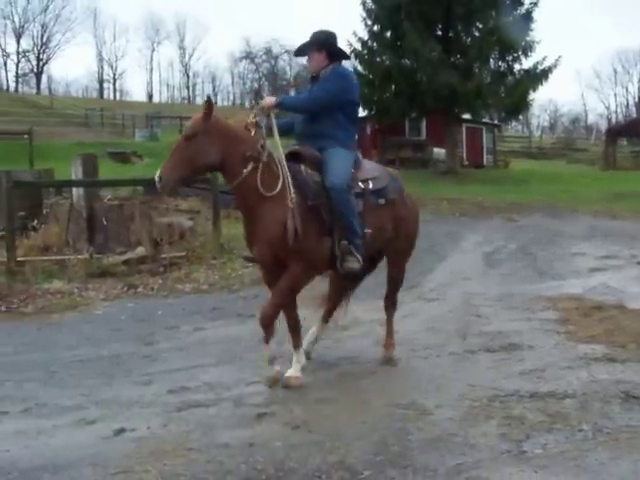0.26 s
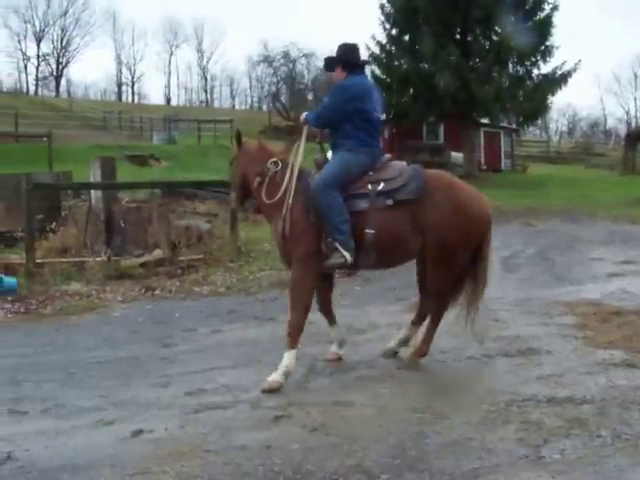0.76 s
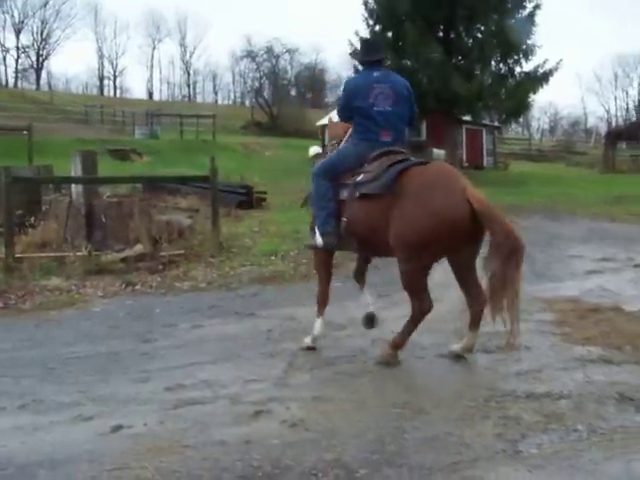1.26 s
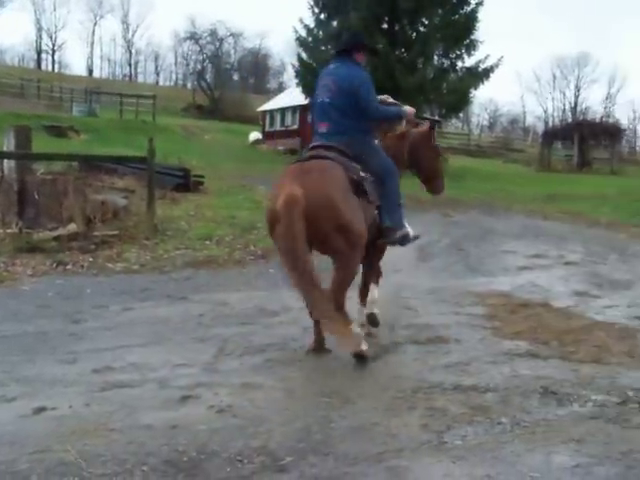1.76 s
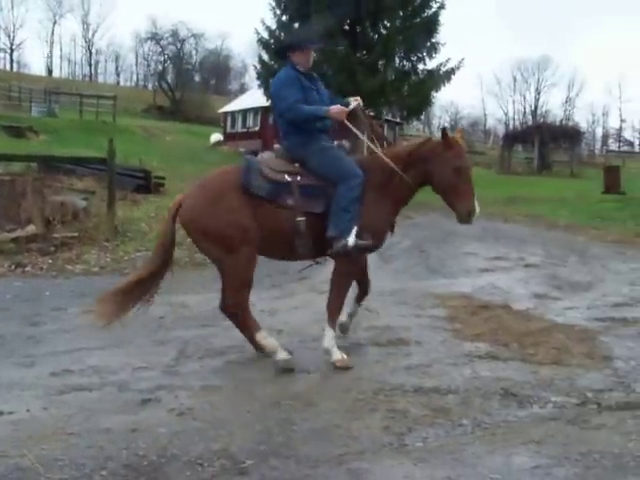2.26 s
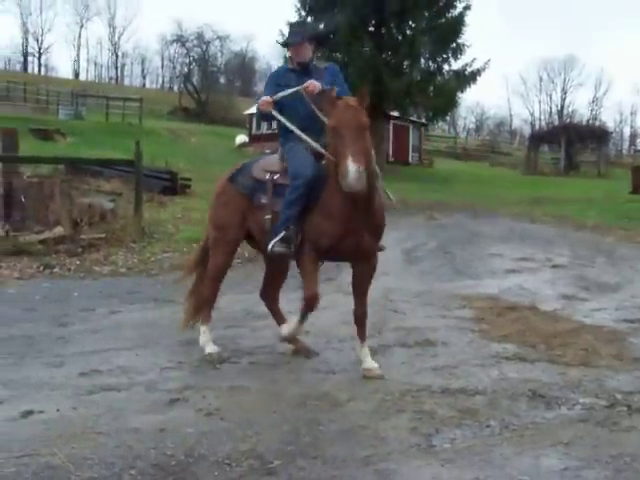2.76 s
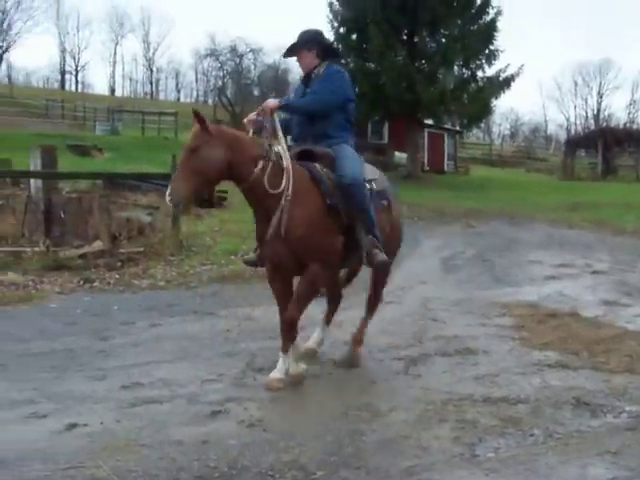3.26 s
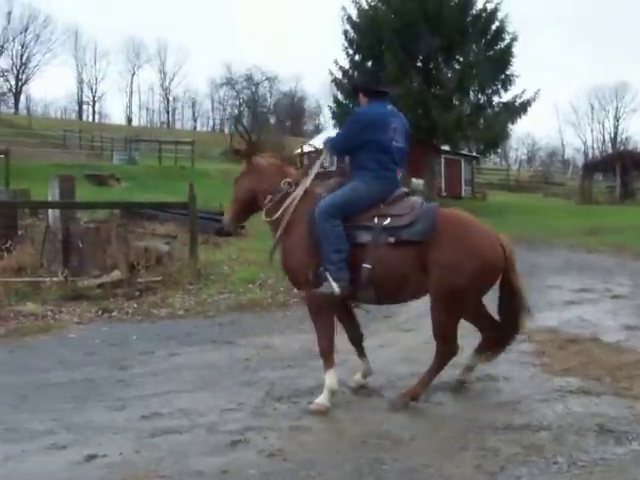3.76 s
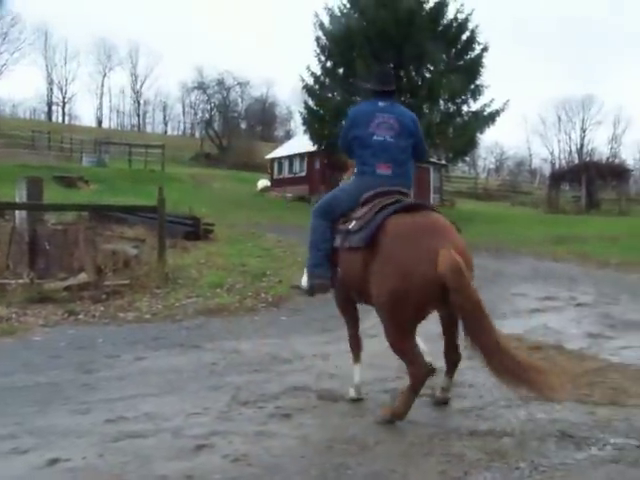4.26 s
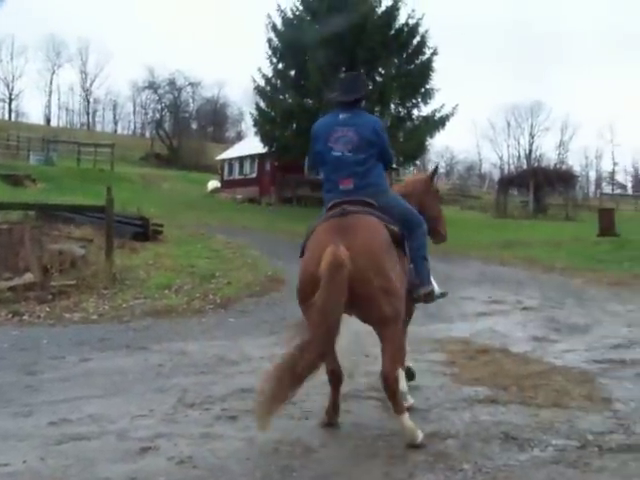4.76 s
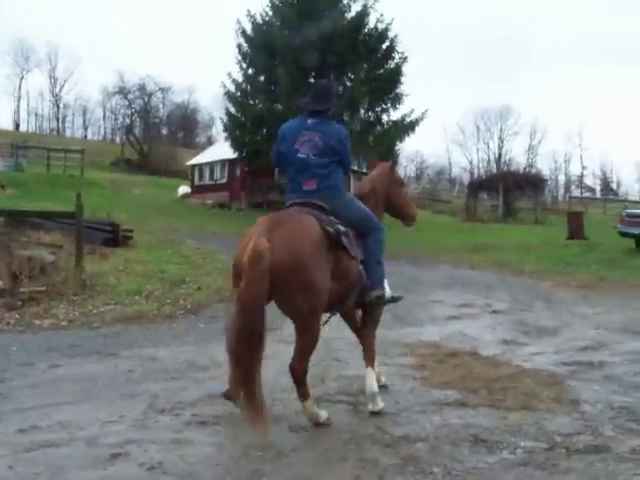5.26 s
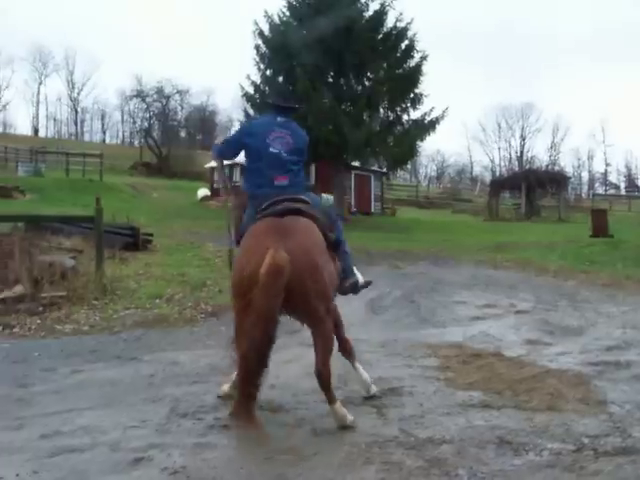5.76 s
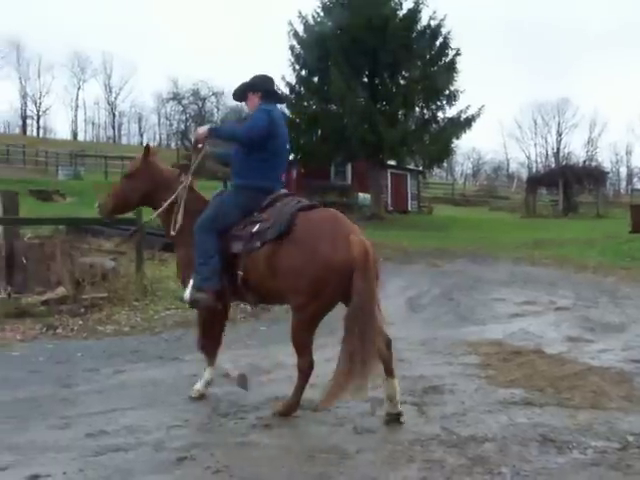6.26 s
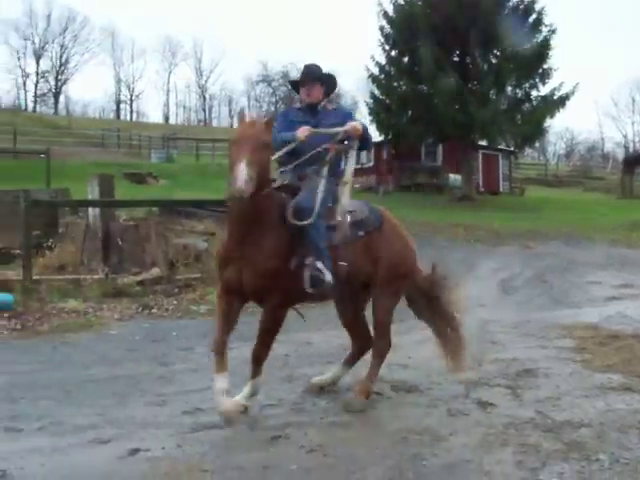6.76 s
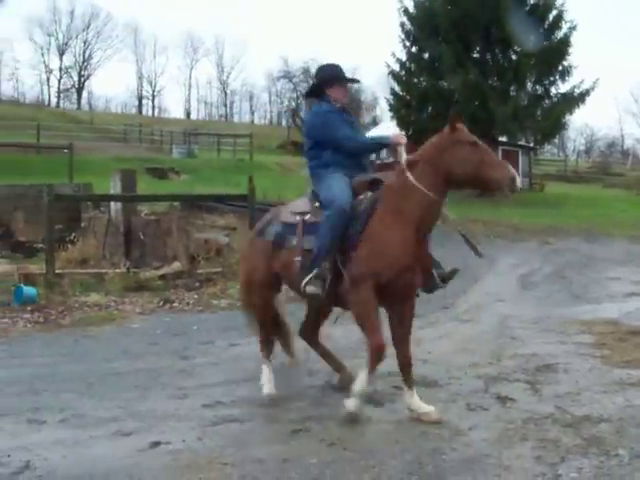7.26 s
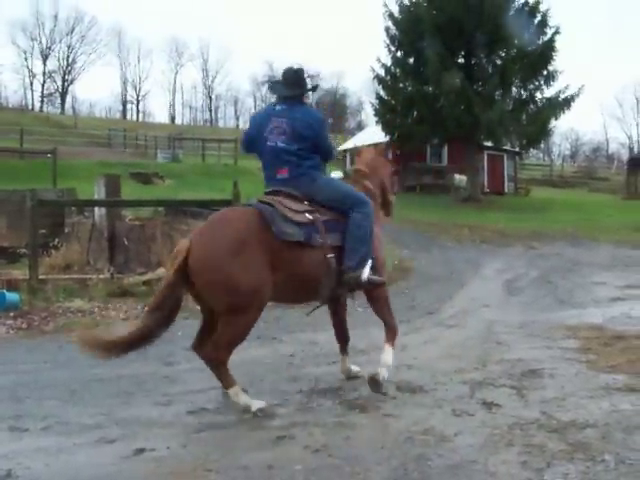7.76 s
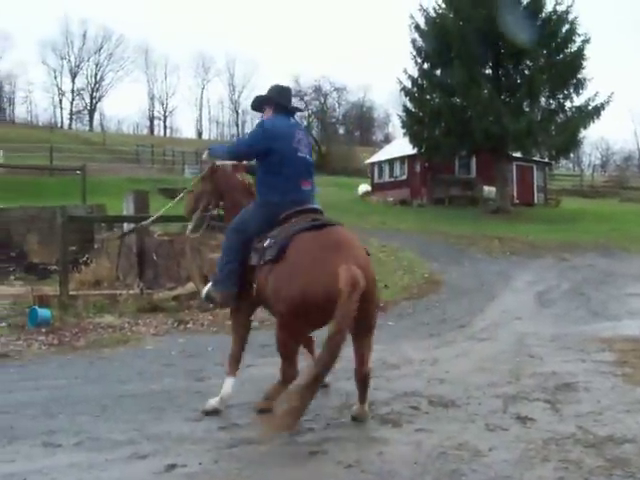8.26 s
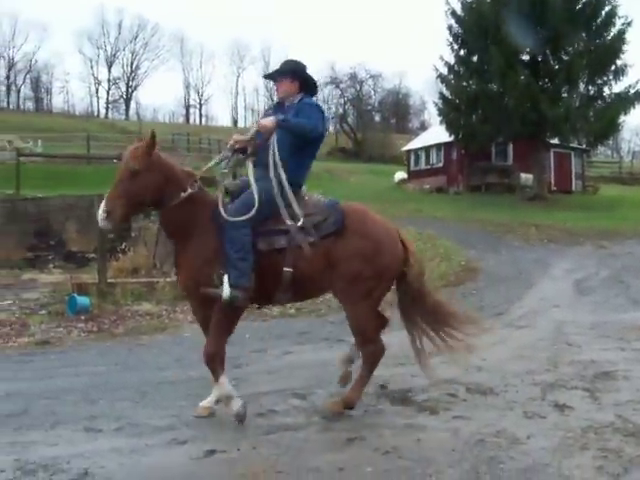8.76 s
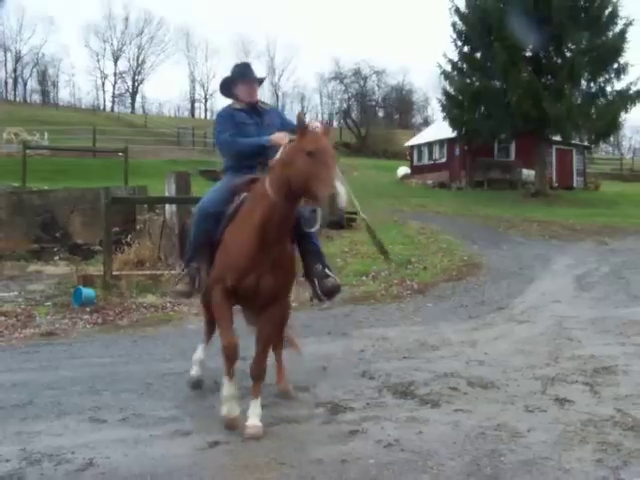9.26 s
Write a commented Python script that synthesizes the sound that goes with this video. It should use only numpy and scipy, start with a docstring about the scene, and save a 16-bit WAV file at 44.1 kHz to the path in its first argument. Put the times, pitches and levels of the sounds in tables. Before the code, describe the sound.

A horse turns on the spot on wet gravel, a few metres from a small stereo microphone in an open yard with barely any echo. Low gusty wind rumbles from the start; from about 0.3 s hooves scrape grit, crunch stones lightly and knock hollowly. Near 1.7 s stones squeak briefly, followed at 1.8 s by the sharpest, loudest crunch. Steps continue unevenly, with another snap at 2.4 s and grinding drags around 3 s. Dull thuds join some steps from 3.8 s, and a dense crunching cluster with strong clops comes at 4.4 s. Wind nearly drops away between 5.1 and 6.4 s, exposing cracks and scrapes. A thin stone squeak sounds at 6.45 s, then brisk grinding and crunches around 7 s. A short gust buffets near 8.6 s while sparser scrapes and hollow knocks go on to the end at 9.5 s.

```python
"""A ridden horse turns on the spot on wet gravel, a few metres from a small stereo camera, for 9.5 s.
It opens in wind, low noise driven by gusts at both microphone ports; from 0.3 s hooves knock (a hollow
resonance), crush stones (bursts of contacts) and grind the grit (dense clicks through resonances).
Stones squeal near 1.7 s; the crunches are strongest near 1.8 s and dense near 4.4 s; from 3.8 s damped thuds
join some footfalls. The breeze is weakest from 5.1 to 6.4 s, a stone squeals at 6.45 s, hooves go on to the end."""
import sys
import numpy as np
from scipy import signal
from scipy.fft import rfft, irfft
from scipy.io import wavfile
from scipy.ndimage import uniform_filter1d

SR = 44100
rng = np.random.default_rng(int(sys.argv[2]) if len(sys.argv) > 2 else 0)


def unload_audio(sound):
    """Save the sound as a 16-bit wav file, at the path given as the first command line argument."""
    columns = np.transpose(np.atleast_2d(sound))
    # keep every value between -1 and 1, then stretch to whole-number steps
    steps = np.round(np.clip(columns, -1, 1) * 32767)
    wavfile.write(sys.argv[1], SR, steps.astype(np.int16))


N = 419832
TIME = np.arange(N) / SR

# All source levels are before the mix, the ports and the camera response.
# stones crushed under a hoof: (t/s, length/s, level/dB, stone resonance f/Hz)
CRUSHED_STONES = [(0.326, 0.0015, -19.5, 2100), (0.512, 0.018, -25, 2700), (0.68, 0.0034, -18, 2300),
                  (0.702, 0.009, -18, 2240), (0.748, 0.004, -28, 3400), (1.049, 0.002, -21, 3040),
                  (1.177, 0.015, -22.5, 2230), (1.271, 0.002, -21, 3640), (1.456, 0.00097, -21, 2770),
                  (1.482, 0.0076, -19, 2160), (1.534, 0.011, -13.5, 3020), (1.77, 0.014, -15, 3300),
                  (1.8, 0.0016, -4.5, 3220), (1.811, 0.013, -8, 3300), (1.826, 0.014, -14, 3470),
                  (1.872, 0.0075, -20.5, 3500), (2.262, 0.015, -14.5, 3350), (2.351, 0.009, -18.5, 4550),
                  (2.384, 0.0013, -8, 3100), (2.407, 0.0073, -16.5, 4600), (2.67, 0.0049, -21, 3100),
                  (2.902, 0.0096, -18, 3130), (3.493, 0.0065, -19, 3420), (3.68, 0.027, -18, 3870),
                  (3.822, 0.0077, -21.5, 3240), (3.867, 0.0077, -16, 3230), (4.036, 0.0088, -19, 3500),
                  (4.096, 0.011, -16.5, 3440), (4.282, 0.019, -19, 4160), (4.315, 0.0061, -13, 4100),
                  (4.347, 0.0026, -17, 4470), (4.364, 0.012, -16.5, 3290), (4.383, 0.01, -9.5, 4770),
                  (4.399, 0.0065, -7, 4700), (4.413, 0.02, -9.5, 3660), (4.568, 0.0011, -19.5, 2940),
                  (4.995, 0.0031, -20.5, 4620), (5.124, 0.015, -15.5, 3920), (5.23, 0.0056, -24, 4260),
                  (5.346, 0.0075, -18.5, 1450), (5.572, 0.0033, -22, 2230), (5.585, 0.0096, -9.5, 3200),
                  (5.615, 0.01, -16, 3330), (5.695, 0.0042, -12.5, 3530), (5.75, 0.0041, -13.5, 3400),
                  (6.187, 0.003, -9, 1730), (6.21, 0.0023, -12, 3870), (6.286, 0.0032, -17.5, 3680),
                  (6.469, 0.0016, -18, 4320), (6.546, 0.0035, -19, 4300), (6.622, 0.022, -17, 2020),
                  (6.706, 0.017, -20, 4900), (6.811, 0.0068, -22.5, 3800), (6.851, 0.0094, -17, 4800),
                  (6.899, 0.0062, -8.5, 4830), (7.024, 0.013, -19.5, 3780), (7.226, 0.0053, -18, 4100),
                  (7.241, 0.002, -9, 4140), (7.272, 0.0069, -18.5, 3300), (7.287, 0.029, -16.5, 4320),
                  (7.495, 0.003, -21, 3930), (7.695, 0.013, -22, 2800), (7.768, 0.03, -21, 3380),
                  (8.069, 0.0059, -15.5, 3720), (8.087, 0.0085, -12.5, 1980), (8.114, 0.0067, -21, 1620),
                  (8.248, 0.0022, -8.5, 3150), (8.269, 0.012, -21.5, 3940), (8.365, 0.007, -17, 3540),
                  (8.424, 0.014, -21.5, 4100), (8.447, 0.0031, -13, 4100), (8.692, 0.0087, -17.5, 3330),
                  (8.761, 0.024, -21, 4300), (9.182, 0.03, -19, 3900)]
# a hoof drags or pivots on the grit: (t/s, length/s, level/dB, swell over the length/dB)
HOOF_SCRAPES = [(0.264, 0.12, -32, 4), (0.438, 0.11, -28, -13), (0.682, 0.19, -27.5, 1.5),
                (0.95, 0.1, -25.5, -3.5), (1.096, 0.17, -29, -7), (1.397, 0.042, -18.5, 1.5),
                (1.55, 0.1, -31.5, -1), (1.674, 0.05, -24.5, -3), (1.841, 0.1, -24.5, -5),
                (2.114, 0.15, -25.5, -4), (2.298, 0.14, -25, 16.5), (2.582, 0.14, -29, -7),
                (2.856, 0.31, -30, -5), (3.046, 0.205, -27, 17.5), (3.304, 0.084, -31, -4),
                (3.592, 0.14, -23.5, 1), (3.753, 0.089, -18, -9.5), (3.928, 0.12, -24, 1),
                (4.071, 0.096, -24.5, -8), (4.21, 0.22, -24, 12), (4.424, 0.085, -17, -8.5),
                (4.639, 0.048, -26.5, 3.5), (4.775, 0.037, -31, -5), (4.903, 0.097, -32.5, 10),
                (5.081, 0.094, -25, 9), (5.327, 0.093, -27, -3.5), (5.505, 0.028, -20, -3),
                (5.59, 0.042, -23, -3), (5.732, 0.13, -25, -0.5), (5.964, 0.16, -28, 3),
                (6.154, 0.18, -27, -2), (6.441, 0.069, -29.5, 11), (6.54, 0.1, -18.5, -7),
                (6.704, 0.069, -26.5, -14), (6.806, .14, -22, 0), (7.023, 0.068, -17.5, 2.5),
                (7.109, 0.2, -21.5, 8.5), (7.383, 0.041, -16, -2.5), (7.476, 0.04, -19.5, 1),
                (7.563, 0.11, -22.5, 2), (7.768, 0.16, -30.5, -18), (7.943, 0.038, -22, 0.5),
                (8.069, 0.047, -28.5, -5), (8.187, 0.15, -24, 2), (8.352, 0.097, -18, -6),
                (8.478, 0.15, -28.5, -8), (8.663, 0.15, -27.5, -6), (8.875, 0.2, -27, 9),
                (9.334, 0.2, -28.5, -11)]
# grit that keeps shifting under the standing legs: (t/s, level/dB)
GRIT_SHUFFLE = [(0, -35), (1.35, -40.5), (1.9, -30), (2.7, -31.5), (4.3, -27.5), (5.3, -39.5), (6.4, -36.5),
                (7.2, -30.5), (8.4, -33.5), (9.25, -36)]
# how flat the sole lies on the grit: (t/s, level of the hollow resonance/dB)
SOLE_HOLLOW = [(0, -10), (2.3, -19), (2.7, -2.5), (3.2, -15), (4.4, -12.5), (4.8, -5.5), (5.5, -10),
               (6.05, -1.5), (6.4, -9.5), (7.2, -15.5), (7.6, -9), (8.4, -11), (9.5, -4.5)]
# spectral colour of gravel: (f/Hz, gain/dB)
GRAVEL_COLOUR = [(120, -7), (330, -12), (500, -6), (750, 1), (1100, -1.5), (1450, -3.5), (2200, 0),
                 (2550, -4), (3350, 0.5), (3900, 0.5), (4400, 0), (5600, -8.5), (6700, -4.5), (7500, -12),
                 (8500, -32.5)]
# hollow knocks of the cupped hoof: (t/s, resonance f/Hz, level/dB)
HOOF_KNOCKS = [(0.294, 1080, -30.5), (1.148, 1090, -29), (1.271, 897, -28), (1.413, 1070, -23),
               (1.832, 1060, -20), (1.908, 845, -22.5), (2.655, 835, -27), (3.498, 1040, -21.5),
               (3.717, 705, -26), (3.759, 643, -27.5), (3.927, 478, -27.5), (3.989, 750, -26.5),
               (4.101, 1110, -21), (4.384, 880, -18), (4.414, 1170, -15.5), (4.807, 760, -30),
               (4.995, 745, -30.5), (5.063, 727, -30.5), (5.088, 755, -24.5), (5.127, 910, -22.5),
               (5.233, 560, -37.5), (5.262, 567, -37), (5.35, 1090, -26), (5.619, 926, -20),
               (5.695, 730, -21.5), (6.091, 810, -23), (6.175, 666, -28), (6.207, 920, -25),
               (6.483, 1100, -28.5), (6.58, 900, -20.5), (6.629, 770, -26), (6.715, 1015, -21),
               (6.853, 712, -22), (6.945, 642, -29), (7.495, 650, -24), (7.582, 1024, -22),
               (8.09, 1020, -21.5), (8.118, 990, -23), (8.964, 860, -27.5), (9.111, 687, -26.5),
               (9.189, 540, -22), (9.387, 760, -24)]
# a stone skids under the hoof: (centre t/s, half length to 1/e/s, mean f/Hz, pole bandwidth/Hz, level/dB)
STONE_SKIDS = [(1.697, .017, 3430, 800, -23.5), (1.729, 0.011, 2850, 550, -24),
               (6.451, 0.0087, 2606, 170, -19.5)]
# weight coming down on the ground: (t/s, level/dB)
GROUND_THUMPS = [(3.762, -20.5), (3.926, -20.5), (4.408, -24), (5.584, -33), (6.81, -27.5), (8.088, -26.5),
                 (9.185, -33)]
# gusts that reach the microphone: (t/s, length/s, level/dB)
WIND_GUSTS = [(-.1, 1.11, -24.5), (1.134, 0.52, -26), (1.76, 0.71, -26), (2.843, 0.065, -35),
              (3.034, 0.35, -28.5), (3.593, 0.23, -24.5), (4.097, 0.081, -29), (4.306, 0.3, -30),
              (4.76, 0.057, -35.5), (5.523, 0.29, -40), (6.155, 0.12, -42.5), (7.254, 0.13, -38),
              (8.033, 0.19, -30), (8.572, 0.066, -22.5), (8.713, 0.79, -35)]
# the light breeze between the gusts: (t/s, level/dB)
LIGHT_BREEZE = [(0, -31), (2.8, -40), (4.3, -42), (5.1, -51.5), (6.4, -51.5), (7.6, -46), (9.5, -42)]
# spectral colour of the wind rumble: (f/Hz, gain/dB)
WIND_COLOUR = [(20, -4), (60, 2), (130, 0), (220, -4), (330, -12.5), (1100, -55.5)]
# how the two ports differ: (f/Hz, left minus right/dB, side filter gain before a common offset/dB)
PORT_DIFFERENCES = [(298, 0, -21), (795, -0.5, -38.5), (1780, -5.5, -11), (2420, 2.5, -6), (2650, 8.5, -9),
                    (4300, -2, -11), (7950, 2, -3.5)]

SCRAPE_RISE_S, SCRAPE_FALL_S = 0.015, 0.02
GUST_RISE_S, GUST_FALL_S = 0.06, 0.066
TOP_HZ = 8700  # edge of the camera's lowpass


def undb(db):
    """Logarithmic level: decibels to amplitude gain."""
    return 10 ** (np.asarray(db) / 20)


def unit(x):
    """Normalisation: scale to rms 1."""
    return x / np.sqrt(np.mean(x ** 2) + 1e-18)


def curve(rows):
    """Linear interpolation: join (t/s, value) rows by straight lines."""
    return np.interp(TIME, *np.transpose(rows))


def colour(x, hz, db):
    """Minimum-phase filtering: a causal response through (f/Hz, gain/dB) points, by way of the cepstrum."""
    size = 4096
    bins = np.maximum(np.fft.rfftfreq(size, 1 / SR), 1)
    log_gain = np.log(undb(np.interp(np.log(bins), np.log(hz), db)))
    cepstrum = irfft(log_gain)
    # fold the negative times onto the positive ones
    cepstrum[1:size // 2] *= 2
    cepstrum[size // 2 + 1:] = 0
    response = irfft(np.exp(rfft(cepstrum)))
    return signal.fftconvolve(x, response)[:len(x)]


def ring(x, hz, q):
    """Resonance: one damped mode with gain 1 at its centre."""
    return signal.lfilter(*signal.iirpeak(min(hz, SR / 3), max(q, 1), fs=SR), x)


def moving_ring(x, hz, width_hz):
    """Resonance of varying frequency: shift the pitch curve to zero, smooth with two poles, shift back."""
    turn = np.exp(2j * np.pi * np.cumsum(hz) / SR)
    pole = np.exp(-np.pi * width_hz / SR)
    baseband = signal.lfilter([1], np.poly([pole, pole]), x / turn)
    return unit((baseband * turn).real)


def add(track, s, sound):
    """Superposition: lay a sound into a track at time s."""
    start = max(int(s * SR), 0)
    track[start:start + len(sound)] += sound[:max(N - start, 0)]


def clicks(count, rate, spread_db):
    """Random impacts: stone contacts at random moments, many small and a few large."""
    size = undb(spread_db * np.minimum(rng.standard_exponential(count), 4))
    hit = rng.random(count) < rate / SR
    return unit(hit * size * rng.choice([-1, 1], count))


def walk(rate):
    """Random fluctuation: bounded levels held 1 / rate s, smoothed twice and scaled to rms 1."""
    hold = int(SR / rate)
    steps = np.repeat(rng.uniform(-1, 1, N // hold + 1), hold)[:N]
    return unit(uniform_filter1d(uniform_filter1d(steps, hold), hold))


def envelope(s, length, rise_s, fall_s, swell_db=0):
    """Attack and decay: a linear rise, a hold with a steady swell or fade, an exponential fall."""
    t = TIME - s
    rise = np.clip(t / rise_s, 0, 1)
    held = np.clip(t / length, 0, 1)
    fall = np.exp(-np.maximum(t - length, 0) / fall_s)
    return rise * undb(swell_db * (held - .5)) * fall


def crunches(rise_s=0.001, fall_s=0.0016, stone_db=4, settle_db=-21, settle_s=0.043, crack_db=-2, crack_s=0.00054):
    """Fracture and settling: a stone cracks, contacts burst under the hoof, and loose stones settle."""
    out, t = np.zeros(N), TIME[:SR // 8]
    for s, length, db, hz in CRUSHED_STONES:
        after = np.maximum(t - length, 0)
        dying = np.exp(-after / fall_s) + undb(settle_db) * np.exp(-after / settle_s)
        press = np.minimum(t / rise_s, 1) * dying
        contacts = press * clicks(len(t), rate=7000, spread_db=3.5)
        crack = undb(crack_db) * rng.standard_normal(len(t)) * np.exp(-t / crack_s)
        blow = contacts + crack
        ringing = blow + undb(stone_db) * ring(blow, hz, q=6.0)
        stones = colour(ringing, *np.transpose(GRAVEL_COLOUR))
        add(out, s, undb(db) * stones / np.std(stones[t < length + rise_s]))
    return out


def grinding(snap_db=-5, tick_db=-4.0, slip_db=3.0, shift_db=4.0, tilt_db=4.0, sole_width_hz=170, sole_bend=.11):
    """Stick-slip friction: grit catches under a turning hoof, single stones snap, and the sole rings hollow."""
    # fine wet sand hisses, and coarse chips tick through it
    sand = clicks(N, rate=5000, spread_db=0.5)
    grit = sand + undb(tick_db) * clicks(N, rate=150, spread_db=2.5)
    # the stones under the hoof change, and the colour of the scrape with them
    scrape = np.zeros(N)
    for k, hz in enumerate(np.geomspace(450, 8000, num=8)):
        band = ring(ring(grit, hz, q=1.55), hz, q=1.55)
        scrape += (-1) ** k * undb(shift_db * walk(rate=30)) * band
    stones = unit(colour(unit(scrape) + undb(snap_db) * snaps(), *np.transpose(GRAVEL_COLOUR)))
    # the sole's pitch slides as it tilts against the ground
    hollow = np.zeros(N)
    for hz in (740, 980):
        pitch = hz * np.exp(sole_bend * walk(rate=12))
        hollow += undb(tilt_db * walk(rate=14)) * moving_ring(grit, pitch, sole_width_hz)
    rubbing = stones + undb(curve(SOLE_HOLLOW)) * unit(hollow)
    return rubbing * drag() * undb(slip_db * walk(rate=130))


def snaps(rate=45, spread_db=3.0, decay_s=0.0011, q=7):
    """Sudden release: stones snap from under the hoof with decaying noise, each size at its own pitch."""
    out = np.zeros(N)
    for hz in np.geomspace(1900, 5200, num=8):
        releases = np.abs(clicks(N, rate, spread_db)) + 1e-18
        fading = signal.lfilter([1], [1, -np.exp(-1 / (decay_s * SR))], releases)
        out += unit(ring(fading * rng.standard_normal(N), hz, q))
    return unit(out)


def drag():
    """Power addition: the scrapes and a faint shuffle sum as independent grinding sources."""
    power = undb(curve(GRIT_SHUFFLE)) ** 2
    for s, length, db, swell_db in HOOF_SCRAPES:
        power += (undb(db) * envelope(s, length, SCRAPE_RISE_S, SCRAPE_FALL_S, swell_db)) ** 2
    return np.sqrt(power)


def knocks(rise_s=0.0035, q=9, body_db=-4.5, body_hz=790, firm_db=-22, body_growth=0.78):
    """Cavity resonance: a rough contact rings the cupped hoof; firmer steps give a broader, deader clop."""
    out, t = np.zeros(N), TIME[:SR // 8]
    for s, hz, db in HOOF_KNOCKS:
        contact = clicks(len(t), rate=3000, spread_db=5.5) * t * np.exp(-t / rise_s)
        cup = unit(ring(ring(contact, hz, q), hz, q=2.5))
        body = unit(ring(ring(contact, body_hz, q=1), body_hz, q=1))
        # the damped body gains weight with the level of the step
        clop = cup + undb(body_db + body_growth * (db - firm_db)) * body
        # the contact peaks rise_s after it begins
        add(out, s - rise_s, undb(db) * clop / np.std(clop[:SR // 60]))
    return out


def skids(waver=0.022, upper=1.34, upper_db=-13, rough_db=4.5):
    """Friction-driven modes: a skidding stone rings at a wavering pitch with a fainter upper mode, and catches."""
    out = np.zeros(N)
    for s, half, hz, width_hz, db in STONE_SKIDS:
        pitch = hz * (1 + waver * walk(rate=120))
        slip = rng.standard_normal(N)
        upper_mode = moving_ring(slip, upper * pitch, width_hz)
        squeal = moving_ring(slip, pitch, width_hz) + undb(upper_db) * upper_mode
        catching = undb(rough_db * walk(rate=450))
        squeal = squeal * catching * np.exp(-((TIME - s) / half) ** 2)
        out += undb(db) * squeal / np.std(squeal[np.abs(TIME - s) < half])
    return out


def thumps(hz=155, decay_s=0.015):
    """Damped impact response: packed ground answers the horse's weight with a dull thud."""
    out, t = np.zeros(N), TIME[:SR // 8]
    for s, db in GROUND_THUMPS:
        push = rng.standard_normal(len(t)) * np.exp(-t / decay_s)
        thud = ring(ring(push, hz, q=0.95), hz, q=0.95)
        add(out, s, undb(db) * thud / np.std(thud[:SR // 40]))
    return out


def ports(x, scatter_db=1):
    """Interference: short ground and camera-body reflections of wandering strength differ at the two ports."""
    hz, balance_db, side_db = np.transpose(PORT_DIFFERENCES)
    lags = rng.integers(4, 90, size=6)  # in samples
    scattered = sum(walk(rate=6) * np.pad(x, (lag, 0))[:N] for lag in lags) / np.sqrt(len(lags))
    side = colour(scattered, hz, side_db + scatter_db)
    left = colour(x + side, hz, balance_db / 2)
    right = colour(x - side, hz, -balance_db / 2)
    return np.array([left, right])


def yard(x, t60=1.0, wet_db=-25):
    """Diffuse reverberation: a thin noise tail from fences and the woodpile, cut off after 0.5 s."""
    t = TIME[:SR // 2]
    tails = rng.standard_normal((2, len(t))) * np.exp(-np.log(1000) * t / t60)
    wet = [signal.fftconvolve(x, tail / np.linalg.norm(tail))[:N] for tail in tails]
    return undb(wet_db) * np.array(wet)


def wind(buffet_db=1.6, flutter_db=3.0, left_db=2.83, right_db=-1.5, rip_db=-11, rip_hz=430, rip_q=1.02,
         strong_db=-25, rip_growth=.4):
    """Turbulence: separate eddies at each port under common gusts; strong gusts rip more at higher pitch."""
    gust = airflow() * undb(buffet_db * walk(rate=20))
    force = (gust / undb(strong_db)) ** rip_growth
    out = []
    for port_db in (left_db, right_db):
        eddy = undb(flutter_db * walk(rate=50))
        rumble = unit(eddy * colour(rng.standard_normal(N), *np.transpose(WIND_COLOUR)))
        fast_eddies = eddy ** 2 * rng.standard_normal(N)
        rip = unit(ring(ring(fast_eddies, rip_hz, rip_q), rip_hz, rip_q))
        out.append(undb(port_db) * gust * (rumble + undb(rip_db) * force * rip))
    return np.array(out)


def airflow():
    """Power addition: separate gusts and the breeze sum as independent sources."""
    power = undb(curve(LIGHT_BREEZE)) ** 2
    for s, length, db in WIND_GUSTS:
        power += (undb(db) * envelope(s, length, GUST_RISE_S, GUST_FALL_S)) ** 2
    return np.sqrt(power)


def scene():
    """Superposition: hooves on gravel reach the ports directly and by way of the yard, and wind is added."""
    hooves = undb(0.5) * crunches() + undb(-2.5) * grinding() + undb(1.5) * knocks()
    hooves = hooves + skids() + thumps()
    return ports(hooves) + yard(hooves) + wind()


def record(dry, notch_hz=305, notch_q=2.65, slot_hz=968, slot_q=24):
    """Camera response: a wide low-mid notch, a narrow higher one, clipping of any overload, a steep lowpass."""
    notched = dry - 0.81 * ring(dry, notch_hz, notch_q)
    notched = notched - 0.61 * ring(notched, slot_hz, slot_q)
    clipped = np.clip(notched, -.95, .95)
    lowpass = signal.ellip(8, .2, 70, TOP_HZ, fs=SR, output="sos")
    return signal.sosfilt(lowpass, clipped)


dry = scene()
out = record(dry)
unload_audio(out)
```